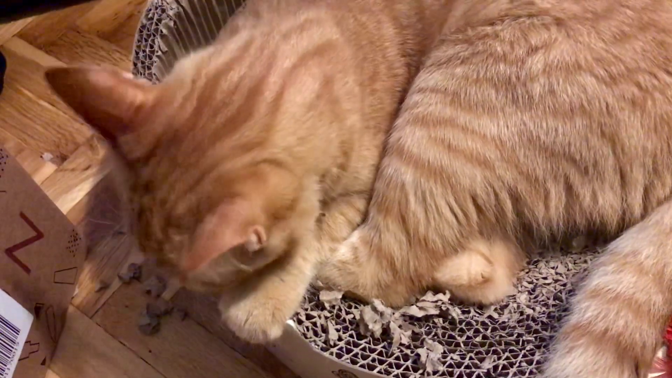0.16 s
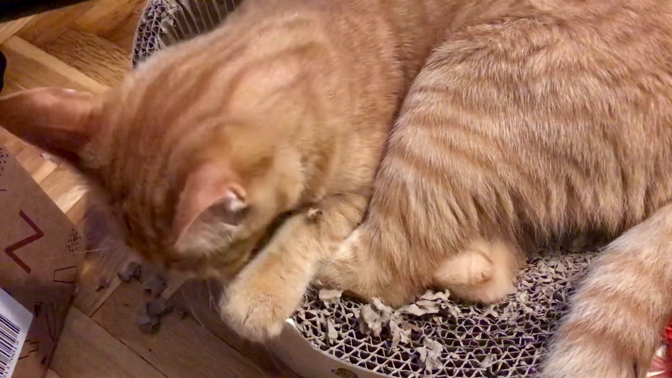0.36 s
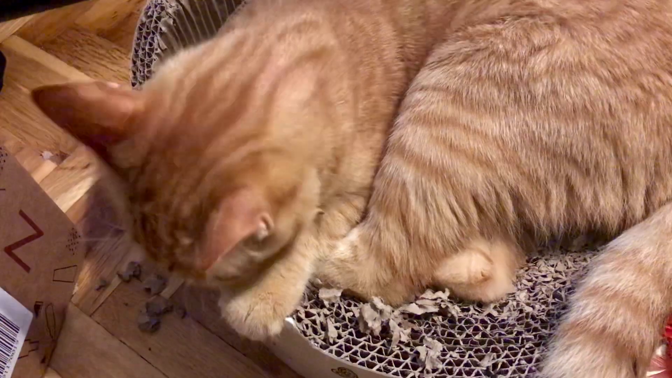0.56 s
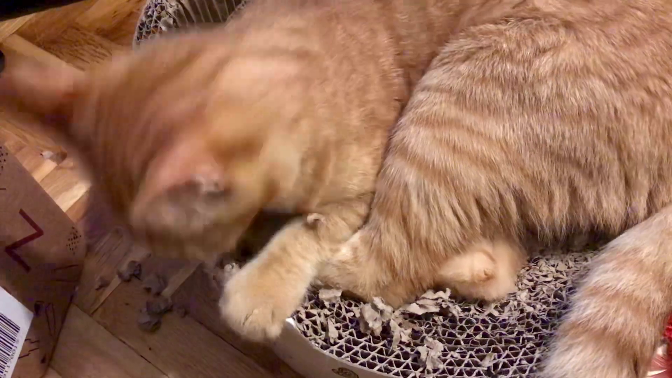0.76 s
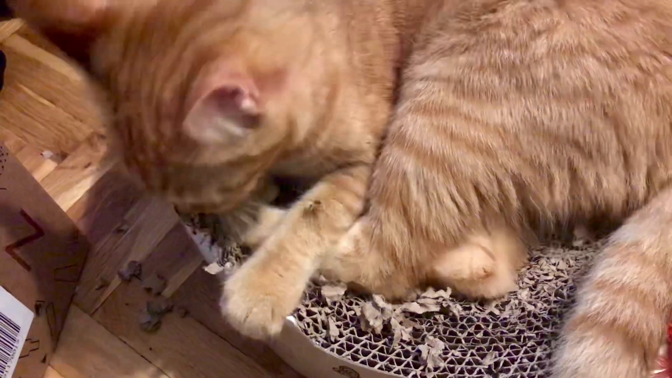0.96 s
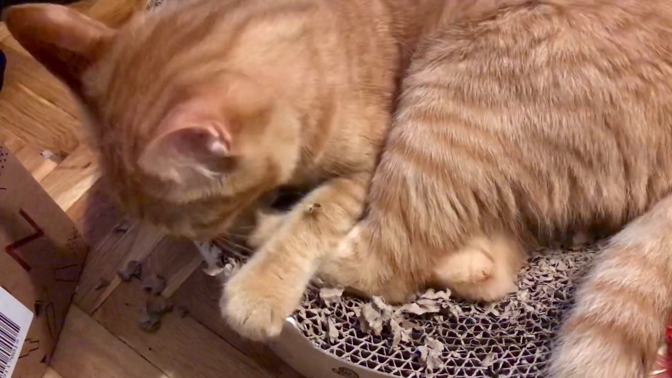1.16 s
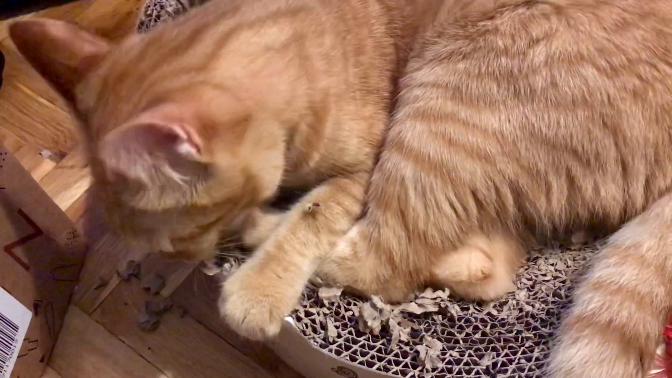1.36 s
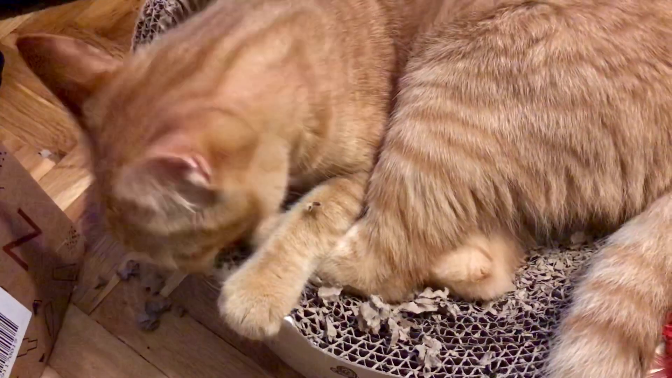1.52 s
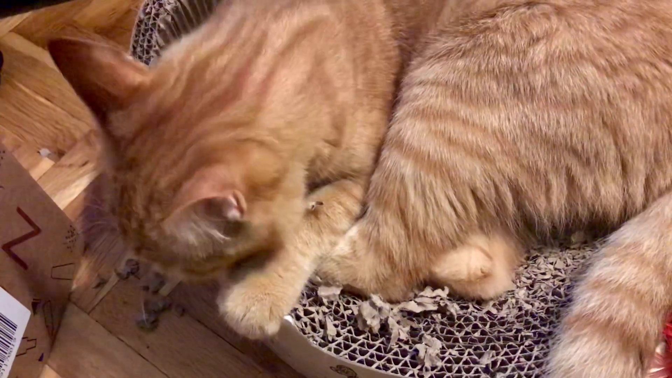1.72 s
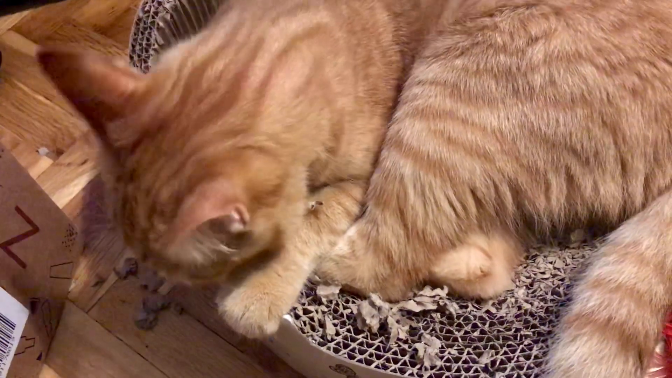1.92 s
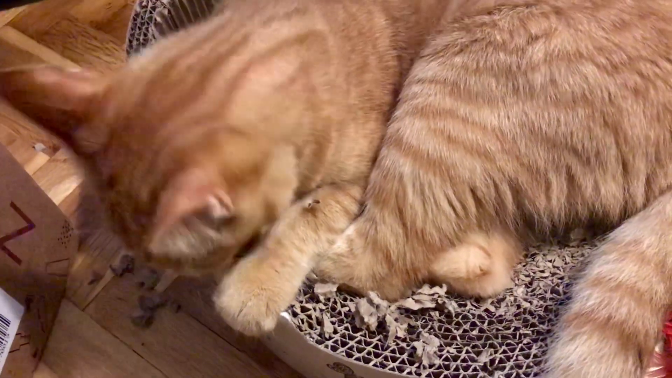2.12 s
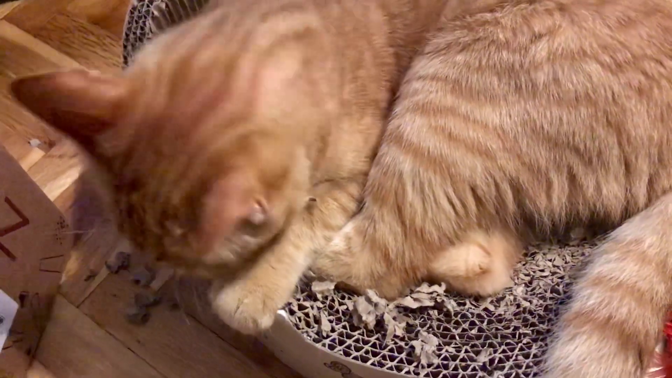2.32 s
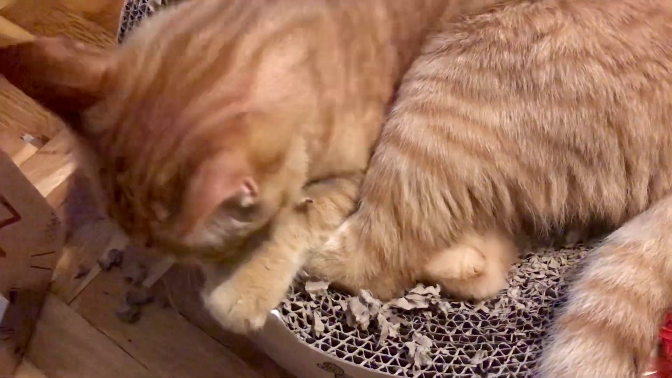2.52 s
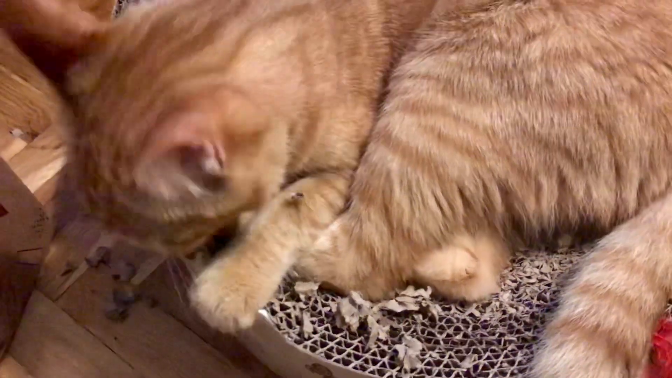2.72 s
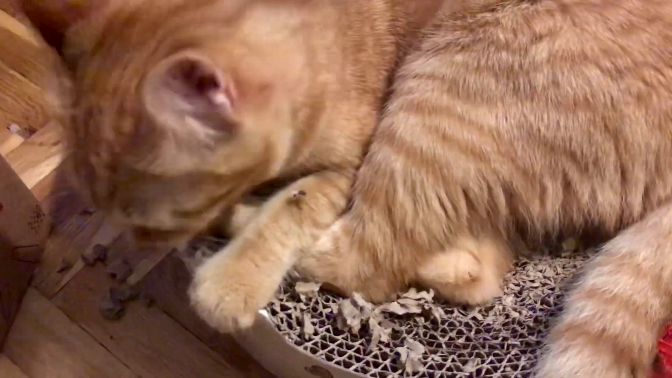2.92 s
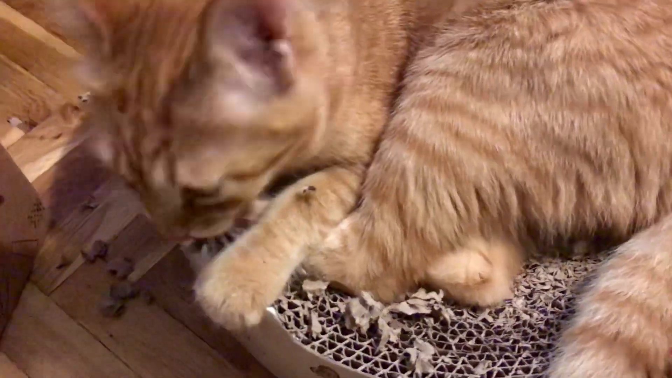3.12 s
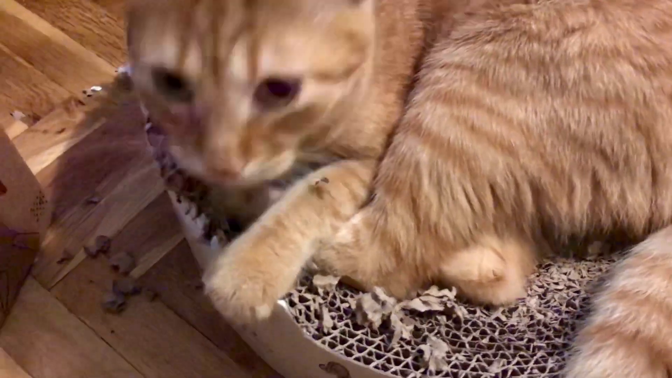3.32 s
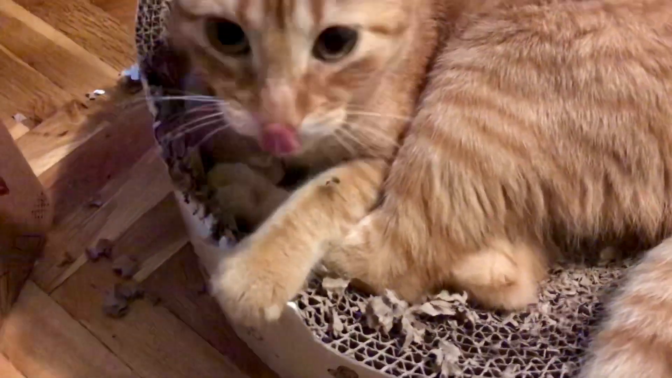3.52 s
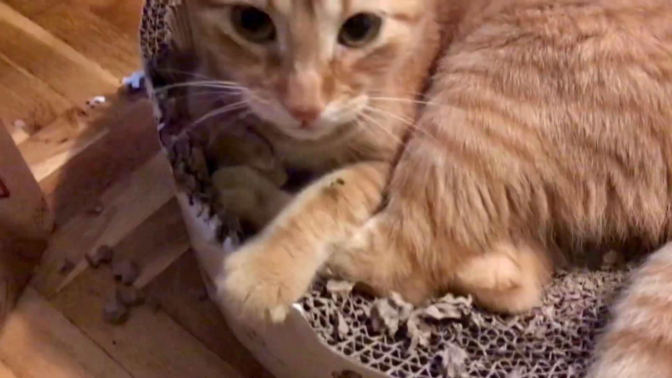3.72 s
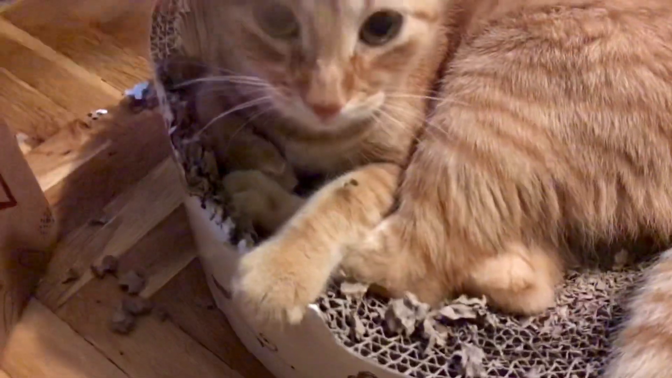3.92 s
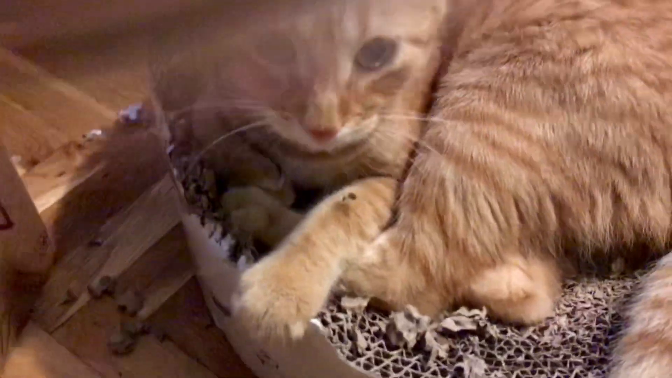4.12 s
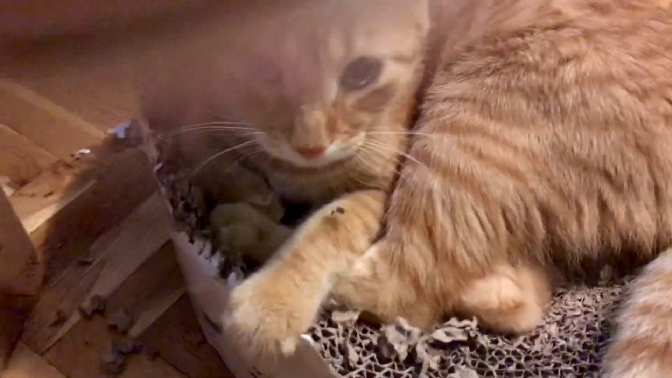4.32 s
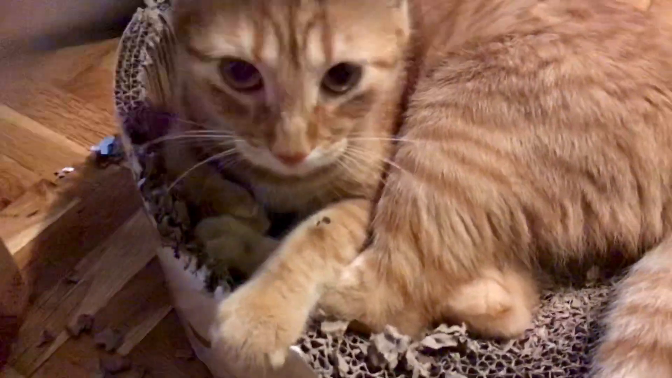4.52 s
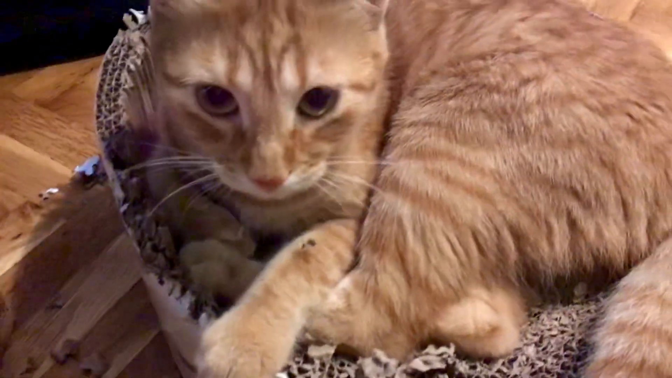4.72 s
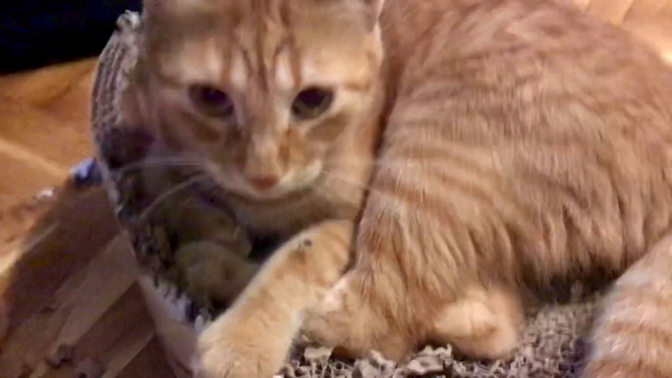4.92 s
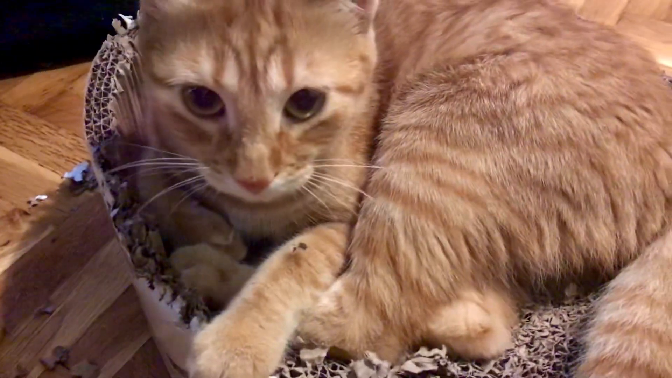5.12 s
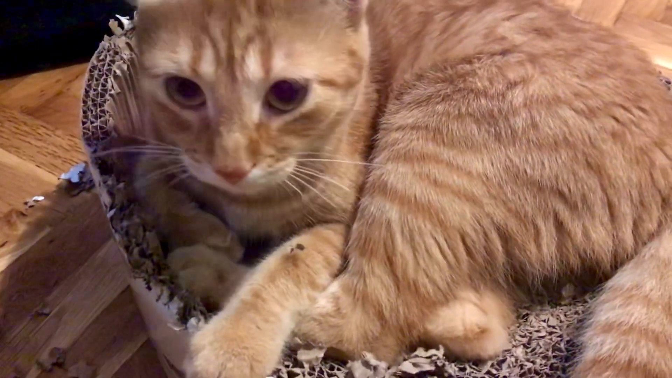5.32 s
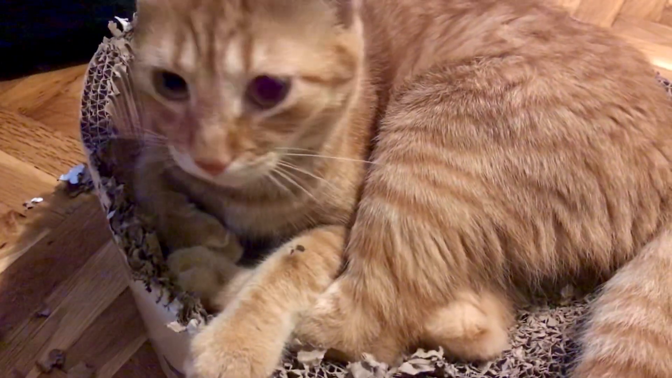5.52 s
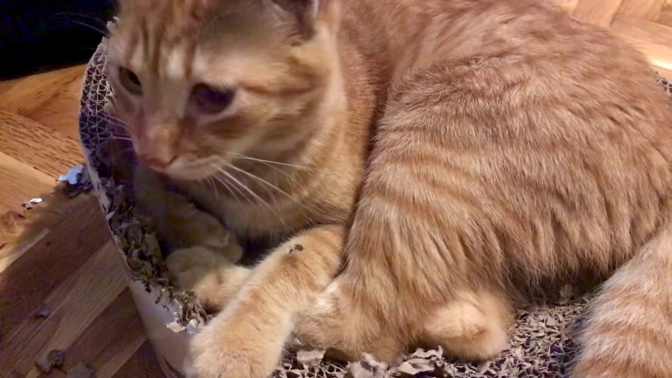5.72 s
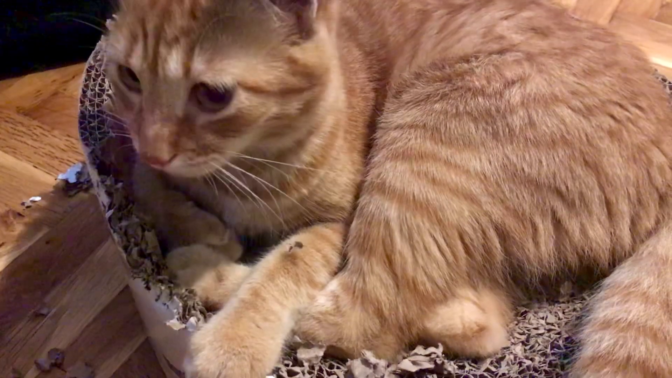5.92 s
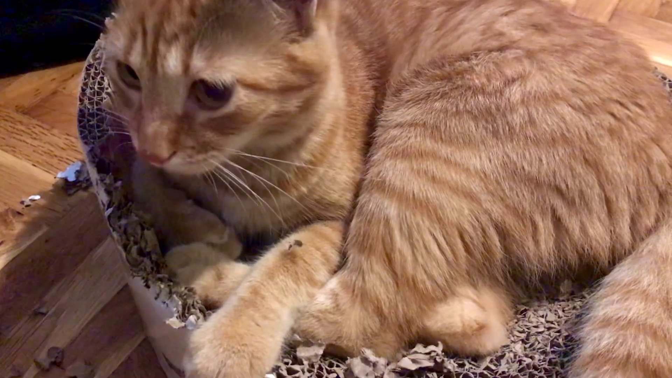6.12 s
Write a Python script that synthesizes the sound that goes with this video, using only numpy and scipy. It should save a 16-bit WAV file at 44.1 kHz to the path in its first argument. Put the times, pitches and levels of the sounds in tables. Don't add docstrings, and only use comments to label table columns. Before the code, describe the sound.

A quiet indoor room with low building rumble, soft steady hiss and a barely audible electrical whine; a small microphone sits close to the cardboard. From 0 s dry fibres snap and crunch, with the strongest crack near 0.2 s, then smaller ticks and short rips to 0.7 s. A creak leads into a hard rip with a low thump at 0.8 s. From 0.9 to 1.7 s it is calmer: faint sniffs, rustling, a few tiny snaps. Around 1.8-2.2 s comes a dense cluster of loud cracks and tears with dull bumps, followed by more crunches at 2.3-2.5 s. Chewing fades by 2.9 s into sparse ticks and light taps, with a very faint breath near 3.6 s. A bright hollow knock sounds at 4.4 s, smaller rattling taps until 4.6 s, a click and bump at 4.94 s, then near silence with a faint bump at 5.4 s and a weak tap at 6.1 s.

```python
import sys
import numpy as np
from scipy import signal
from scipy.fft import rfft, irfft, next_fast_len
from scipy.io import wavfile
from scipy.ndimage import uniform_filter1d, map_coordinates

SR = 44100
rng = np.random.default_rng(int(sys.argv[2]) if len(sys.argv) > 2 else 0)


def attenuation_scalar(level_db):
    decades = np.asarray(level_db, float) / 20
    return 10 ** decades


def generate_wav(sig):
    pcm = np.round(np.clip(np.atleast_2d(sig).T, -1, 1) * 32767).astype(np.int16)
    wavfile.write(sys.argv[1], SR, pcm)


N = 271656
SPAN = 4096

# frequency in Hz, density in dB per Hz.
RUMBLE_SPECTRUM = [(15, -65), (25, -40), (38, -19.5), (52, 1), (63, 4), (86, -13), (113, -3), (134, -13),
                   (162, -7.5), (211, -15), (400, -30), (600, -63)]
# frequency in Hz, density in dB per Hz.
HISS_SPECTRUM = [(150, -22.5), (250, -2.5), (500, -9.5), (1000, -11.5), (2000, -16), (4500, -22),
                 (5000, -21), (6500, -23), (10000, -22), (10500, -30), (11500, -21.5), (15600, -24),
                 (15850, -42), (16500, -57)]
# rms level in dB of overtone 1, 2, 3, ..
WHINE_OVERTONES = [-86.5, -88, -87.5, -87.5, -91, -88.5, -91.5, -97.5, -93, -103.5, -93, -101, -94, -100,
                   -100]
# time in seconds, rustle level in dB.
STIR_CURVE = [(0, -55), (.2, -55), (.46, -63.5), (.84, -54.5), (1.01, -65.5), (1.389, -63), (1.7, -66),
              (1.95, -55), (2.2, -59.5), (2.27, -65.5), (2.41, -62), (2.52, -61), (2.62, -65.5),
              (2.91, -71.5), (3.71, -68.5), (3.93, -72.5), (5.5, -75), (6.16, -70)]
# centre in Hz, width in Hz, level in dB.
CELL_MODES = [(1050, 97, -13.5), (1360, 255, -1), (2455, 880, -3.5), (3064, 330, 1), (4100, 790, -2.5),
              (5570, 210, -1), (6460, 1900, -9)]
# centre in Hz, width in Hz, level in dB.
WALL_MODES = [(169, 46, -3.5), (345, 71, 2), (522, 110, 1.5), (709, 164, -1), (1070, 96, -3.5)]
# frequency in Hz, density in dB per Hz.
SIZZLE_SPECTRUM = [(4120, -37), (7000, -9.5), (10300, -8), (11500, -6), (15200, -10.5), (16100, -27),
                   (16500, -52)]
# start in seconds, peak in dB, pitch in Hz.
TICK_EVENTS = [(.014, -45, 4000), (.3085, -42, 3000), (0.277, -44, 3060), (0.3688, -46, 4340),
               (0.5139, -43.5, 3400), (0.6753, -40.5, 3050), (.6814, -50, 1970), (.757, -54, 7000),
               (0.7646, -48, 3880), (1.0728, -53.5, 7000), (1.7533, -45, 3030), (1.808, -41, 5000),
               (1.819, -41, 5500), (1.9085, -41, 7000), (1.9974, -49, 2910), (4.9238, -51, 4000),
               (4.929, -48.5, 4000)]
# start in seconds, peak in dB, pitch in Hz.
FIBRE_EVENTS = [(0.057, -39.5, 4470), (.2074, -43, 4160), (0.273, -40, 2030), (.3761, -40, 4040),
                (0.4662, -45, 3870), (0.4942, -42, 4000), (.5064, -36.5, 4100), (.6274, -47, 2120),
                (1.0795, -53, 5500), (1.3547, -46, 3810), (1.368, -45, 2440), (1.4972, -44.5, 4030),
                (1.5368, -47, 1320), (1.901, -36.5, 2500), (2.1082, -47, 1300), (2.3224, -39, 3970),
                (2.3306, -35, 4040), (2.4438, -41, 3960), (2.5486, -54, 1380), (2.807, -43.5, 5660),
                (2.8207, -47, 4050), (2.8398, -49, 6150), (3.251, -52.5, 2520), (3.449, -48, 2920),
                (3.681, -53, 3340)]
# start in seconds, peak in dB, pitch in Hz,
# sizzle in relative dB, t60 in seconds.
CRACK_EVENTS = [(.0344, -34.5, 6840, -9, 0.066), (.0408, -34.5, 3130, -24, 0.017),
                (.1424, -33, 4120, -19, 0.014), (.167, -27, 1240, -15, 0.0057), (.171, -29, 3940, -19, .01),
                (0.1917, -25, 4300, -5, 0.02), (.193, -12.5, 5740, -6, .003), (.2952, -30.5, 3380, -7, .01),
                (.3024, -32, 2420, -26, 0.018), (.7966, -22.5, 3230, -4, 0.0094),
                (.851, -31.5, 4700, -7, 0.011), (1.7814, -32, 3100, -7, 0.032),
                (1.8272, -18, 2800, -42, 0.02), (1.8796, -37, 3820, -11, .039),
                (1.92, -15, 3840, -18, 0.023), (1.9284, -20, 3040, -21, 0.012),
                (1.9384, -24, 3100, -26, 0.012), (2.0817, -17.5, 4320, -19, 0.0071),
                (2.167, -28.5, 2450, -5.5, 0.018), (2.1764, -31.5, 2070, -5, 0.0068),
                (2.3476, -23.5, 4400, -17, 0.0031), (2.3785, -33, 4280, -18, 0.0089),
                (2.4633, -34, 4100, -30, .012), (4.9366, -40, 2200, -11, 0.035)]
# start in seconds, hold in seconds, rms level in dB, wall thud in relative dB.
RIP_EVENTS = [(0.027, 0.035, -49, -17), (0.129, .049, -41, -3), (0.187, 0.0095, -39, -2.5),
              (0.216, 0.047, -57.5, -6), (0.273, 0.03, -50, -7.5), (0.309, .075, -54, -9),
              (0.455, 0.075, -62, -8), (0.612, .059, -67.5, -14), (0.667, 0.033, -59.5, -29),
              (0.798, 0.021, -34, -4), (.831, 0.0066, -58, 11), (0.928, 0.086, -65.5, -19),
              (1.582, 0.051, -68, 0.5), (1.822, 0.015, -48.5, 4.5), (1.849, 0.069, -61.5, -0.5),
              (1.927, 0.012, -44.5, 0.5), (2.028, 0.021, -50, -8.5), (2.073, 0.017, -42, -2.5),
              (2.126, 0.077, -59.5, -6), (2.164, 0.018, -52.5, 1.5), (2.291, 0.039, -70.5, -2),
              (2.32, 0.054, -58, 0), (2.47, 0.042, -50, -2), (2.485, 0.018, -44.5, 1),
              (2.505, 0.025, -54.5, 0.5), (2.768, .06, -69.5, -8), (2.879, 0.02, -57, -8),
              (4.394, 0.046, -68, 2), (3.656, 0.059, -70, -16), (4.789, 0.036, -80.5, 7.5)]
# start in seconds, rms level in dB.
STRAIN_EVENTS = [
    (0.105, -70),
    (0.757, -66.5),
    (.787, -51.5),
    (2.448, -61),
    (4.372, -73),
]
# start in seconds, peak in dB, pitch in Hz, t60 in seconds.
THUMP_EVENTS = [(0.148, -57, 160, 0.056), (0.803, -44, 189, 0.19), (1.685, -49.5, 149, 0.04),
                (1.824, -50, 72.7, 0.11), (1.926, -46, 164, 0.14), (2.073, -48, 162.5, 0.16),
                (2.486, -53, 61, 0.11), (2.66, -53.5, 79.5, 0.065), (2.872, -61, 59.2, 0.061),
                (4.936, -31, 193, 0.018), (4.95, -48.5, 66, 0.14), (5.437, -56.5, 101, 0.063)]
# start in seconds, length in seconds, rms level in dB,
# centre in Hz, octave in relative dB.
SNIFF_EVENTS = [
    (0.931, .11, -67, 4300, 6),
    (1.43, 0.19, -70.5, 3350, -5),
    (3.555, 0.3, -77, 3400, -1),
]
# start in seconds, peak in dB, pitch in Hz,
# thud in relative dB, t60 in seconds.
TAP_EVENTS = [(2.660, -51.5, 1500, -7, .0093), (2.874, -59.5, 700, 4.5, 0.014),
              (3.051, -47.5, 1500, -5, 0.0062), (3.333, -53, 1090, -26, 0.017),
              (3.545, -47.5, 1990, -25, 0.0098), (4.385, -25.5, 3420, -15.5, 0.025),
              (4.475, -41, 3630, -28, 0.028), (4.5105, -54, 6000, -19, 0.0055),
              (4.514, -46, 4000, -6.5, 0.011), (4.416, -45, 1500, -23, .03),
              (4.557, -41.5, 6260, -16, 0.012), (4.567, -51.5, 700, -1.5, 0.014),
              (4.616, -58, 1200, -4, 0.012), (4.937, -45.5, 700, 0.5, 0.019),
              (6.139, -50, 600, -8.5, 0.017)]
# centre in Hz, width in Hz, level in dB.
HOLLOW_MODES = [(714, 390, -3), (1567, 176, 2.5), (2330, 500, 2.5), (3100, 660, 2.5), (4260, 450, 7),
                (6150, 4500, -4.5)]
# frequency in Hz, t60 in seconds.
ROOM_DECAY = [(200, 0.17), (2000, 0.24), (10000, 0.015)]


def unit(x):
    return x / np.sqrt(np.mean(x ** 2, axis=-1, keepdims=True) + 1e-20)


def along(points, hz):
    f, v = np.transpose(points)
    return np.interp(np.log(hz + 1), np.log(f + 1), v)


def filtered(x, response):
    m = next_fast_len(x.shape[-1] + SPAN)
    spectrum = rfft(x, m) * response(np.fft.rfftfreq(m, 1 / SR))
    return irfft(spectrum, m)[..., :x.shape[-1]]


def resonances(modes, hz):
    total = 0
    for k, (centre, width, db) in enumerate(modes):
        damping = 1j * hz * width
        total = total + (-1) ** k * attenuation_scalar(db) * damping / (centre * centre - hz * hz + damping)
    return total


def pitched(body, hz, width):
    return lambda f: resonances(body, f) * (0.45 + resonances([(hz, width * hz, 0)], f))


def wobble(rate):
    knots = rng.standard_normal(int(N * rate / SR) + 4)
    return map_coordinates(knots, [np.arange(N) * rate / SR])


def crackle(shape, spiky_db):
    draw = rng.standard_normal(shape + (2,))
    size = attenuation_scalar(spiky_db * np.clip(draw[..., 1], -3, 2.6))
    return unit(draw[..., 0] * size)


def paper(force, thud_db, sizzle_db, colour):
    def wall(f):
        return resonances(WALL_MODES, f) / (1 + 1j * f / 1500)

    def thin_fibres(f):
        return attenuation_scalar(along(SIZZLE_SPECTRUM, f)) + 0j

    grid = np.linspace(0, SR / 2, SPAN)
    total = 0
    for db, path in [(0, colour), (thud_db, wall), (sizzle_db, thin_fibres)]:
        gain = np.sqrt(np.mean(abs(path(grid)) ** 2, axis=-1, keepdims=True))
        total = total + filtered(attenuation_scalar(db) * force, path) / gain
    return total


def breaks(db, t60):
    t = np.arange(SPAN)[None] / SR
    onset = (1 - np.exp(-t / 0.00053)) ** 2
    force = crackle((len(db), SPAN), spiky_db=3) * attenuation_scalar(-60 * t / np.clip(t60, .002, .2)) * onset
    force += 1.84 * np.exp(-((t - 0.000804) / .00003) ** 2)
    return attenuation_scalar(db) * force / np.sqrt(np.mean(force[:, :110] ** 2, axis=1, keepdims=True))


def placed(rows, start_s):
    at = np.round(start_s * SR).astype(int) + np.arange(rows.shape[1]) + SPAN
    return np.bincount(at.ravel(), rows.ravel(), N + 3 * SPAN)[SPAN:SPAN + N]


def stir():
    s, rustle_db = np.transpose(STIR_CURVE)
    return np.interp(np.arange(N) / SR, s, rustle_db)


def rumble():
    noise = unit(filtered(rng.standard_normal(N), lambda f: attenuation_scalar(along(RUMBLE_SPECTRUM, f))))
    return attenuation_scalar(-62.5 + 0.11 * (stir() + 67)) * noise


def hiss():
    return attenuation_scalar(-72.0) * unit(filtered(rng.standard_normal(N), lambda f: attenuation_scalar(along(HISS_SPECTRUM, f))))


def whine():
    clock_hz, fold_hz = 1003.3, 661.5
    t = np.arange(N) / SR
    tones = [((k + 1) * clock_hz, db) for k, db in enumerate(WHINE_OVERTONES)]
    tones += [(k * clock_hz + fold_hz, -110 + .8 * k) for k in range(6, 16)]
    return sum(np.sqrt(2) * attenuation_scalar(db) * np.sin(2 * np.pi * (hz * t + rng.random())) for hz, db in tones)


def rustle():
    scraps = crackle((N,), spiky_db=1.5) * attenuation_scalar(2.5 * wobble(29.89) + 1.3 * wobble(150))
    rubbing = paper(scraps, -4.5, -15.5, lambda f: resonances(CELL_MODES, f))
    return attenuation_scalar(stir() - 5.4) * unit(rubbing)


def snaps():
    # start, peak dB, pitch, wall thud dB, sizzle dB, t60
    rows = [(s, db, hz, -21, sizzle_db, t60) for s, db, hz, sizzle_db, t60 in CRACK_EVENTS]
    rows += [(*row, -27.5, -14.5, 0.016) for row in FIBRE_EVENTS]
    rows += [(*row, -17.5, -1.5, 0.0065) for row in TICK_EVENTS]
    s, db, hz, thud_db, sizzle_db, t60 = np.transpose(rows)[..., None]
    force = breaks(db - 14.5, t60)
    return placed(paper(force, thud_db + 12, sizzle_db + 4, pitched(CELL_MODES, hz, width=.5)), s)


def rips():
    # start, hold, rms dB, wall thud dB, sizzle dB, fall time per 20 dB
    rows = [(*row, -12, 0.013) for row in RIP_EVENTS]
    rows += [(s, .013, db, 5.5, 0, 0.061) for s, db in STRAIN_EVENTS]
    s, hold, db, thud_db, sizzle_db, fall = np.transpose(rows)[..., None]
    t = np.arange(-SPAN // 2, 2 * SPAN)[None] / SR
    rise_db = np.clip(20 * t / 0.0078, -99, 99)
    fall_db = np.clip(20 * (hold - t) / np.clip(fall, .012, .3), -99, 99)
    swell_db = -10 * np.log10(1 + attenuation_scalar(-2 * rise_db) + attenuation_scalar(-2 * fall_db))
    clumps = unit(uniform_filter1d(rng.standard_normal(swell_db.shape), 60, axis=1))
    force = unit(crackle(swell_db.shape, spiky_db=5) * attenuation_scalar(3.2 * clumps)) * attenuation_scalar(db + swell_db)
    size_hz = 3600 * attenuation_scalar(1.7 * rng.standard_normal(s.shape))
    dying_sizzle_db = sizzle_db + .4 * swell_db * (t > hold)
    torn = paper(force, thud_db, dying_sizzle_db, pitched(CELL_MODES, size_hz, width=1.25))
    return placed(torn, s - SPAN // 2 / SR)


def thumps():
    s, db, hz, t60 = np.transpose(THUMP_EVENTS)[..., None]
    t = np.arange(2 * SPAN)[None] / SR
    decay = attenuation_scalar(db + 6.0 - 60 * t / t60)
    return placed(decay * np.sin(2 * np.pi * hz * t) * (1 - np.exp(-t / 0.0022)), s)


def sniffs():
    t = np.arange(N) / SR
    out = np.zeros(N)
    for s, length, db, hz, octave_db in SNIFF_EVENTS:
        nose = [(hz, 350, 0), (2 * hz, 1100, octave_db - 6)]
        air = filtered(rng.standard_normal(N), lambda f: resonances(nose, f))
        breath = np.sin(np.pi * np.clip((t - s) / length, 0, 1)) ** .5
        out += attenuation_scalar(db) * breath * unit(air)
    return out


def taps():
    s, db, hz, thud_db, t60 = np.transpose(TAP_EVENTS)[..., None]

    def soft(f):
        return resonances(HOLLOW_MODES, f) / (1 + 1j * f / (0.56 * hz)) ** 2

    return placed(paper(breaks(db - 12, t60), thud_db + 7.0, -22.5, soft), s)


def room(x):
    hz, t, z = signal.stft(rng.standard_normal(SR // 2), SR, nperseg=256)
    decay = attenuation_scalar(-60 * t / along(ROOM_DECAY, hz)[:, None])
    tail = signal.istft(z * decay, SR, nperseg=256)[1]
    delayed = np.pad(x, (200, 0))
    return signal.fftconvolve(delayed, tail / np.linalg.norm(tail))[:N]


def scene():
    background = rumble() + hiss() + rustle()
    bed = snaps() + rips()
    knocks = taps()
    reverberation = room(attenuation_scalar(-18.5) * bed + attenuation_scalar(-15.5) * knocks)
    return (background + bed + thumps() + sniffs() + knocks + reverberation)[None]


def top_cut(x):
    return signal.sosfilt(signal.butter(12, 16650, fs=SR, output="sos"), x)


def record(dry):
    mix = filtered(dry + whine(), lambda f: f < 16500)
    return top_cut(mix)


dry = scene()
out = record(dry)
generate_wav(out)
```